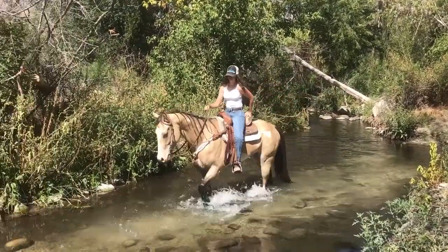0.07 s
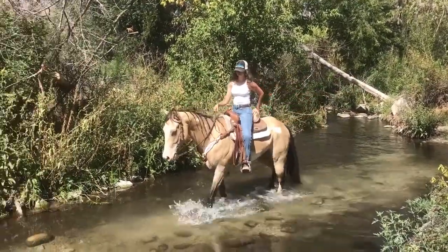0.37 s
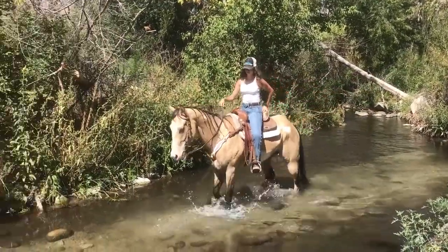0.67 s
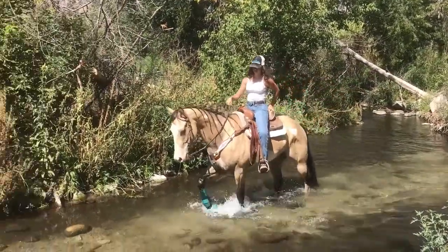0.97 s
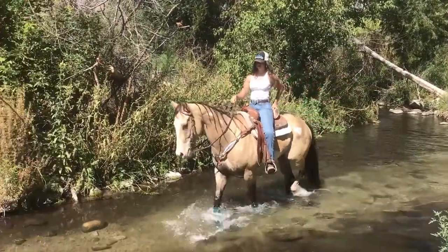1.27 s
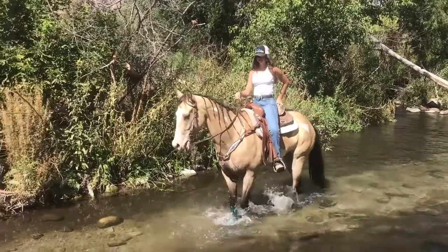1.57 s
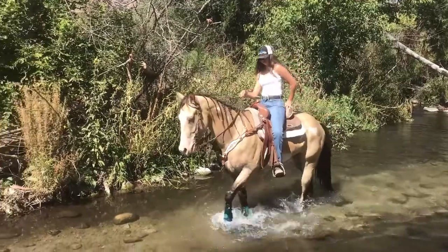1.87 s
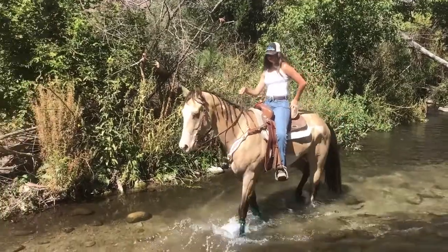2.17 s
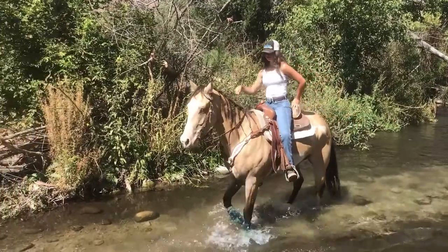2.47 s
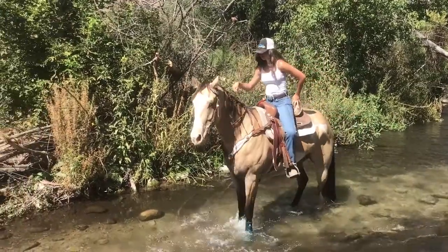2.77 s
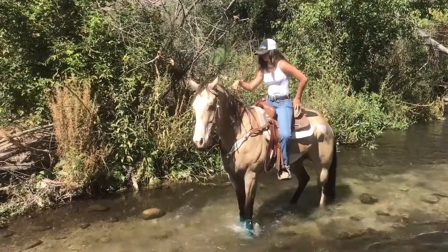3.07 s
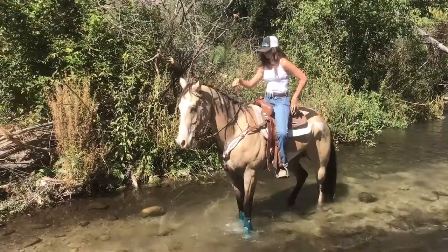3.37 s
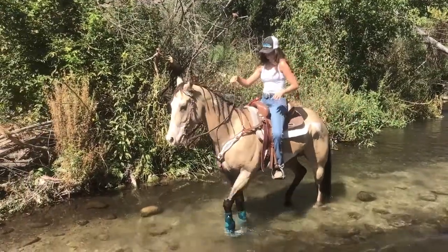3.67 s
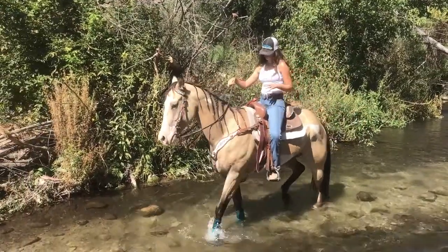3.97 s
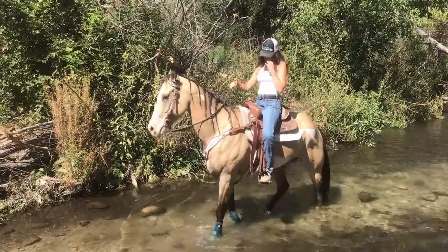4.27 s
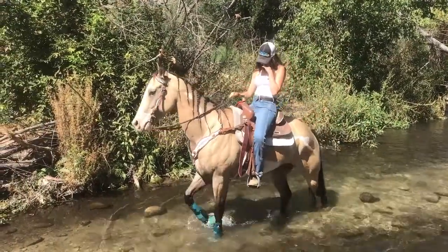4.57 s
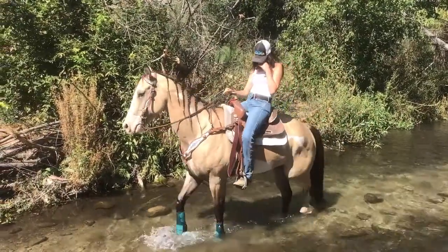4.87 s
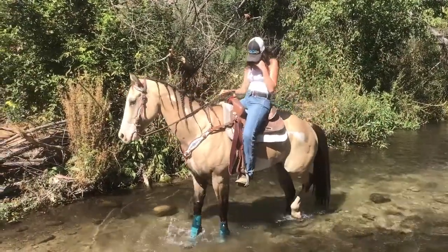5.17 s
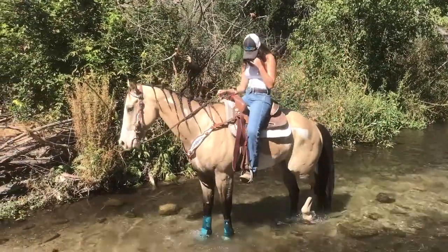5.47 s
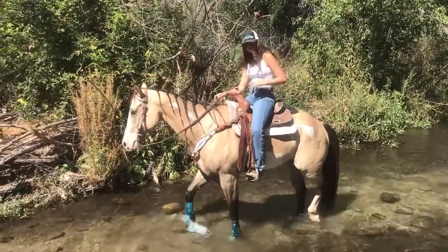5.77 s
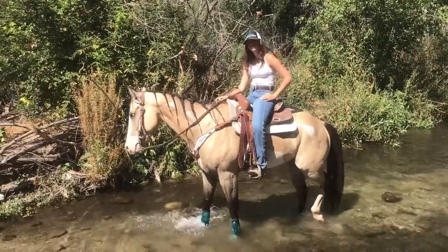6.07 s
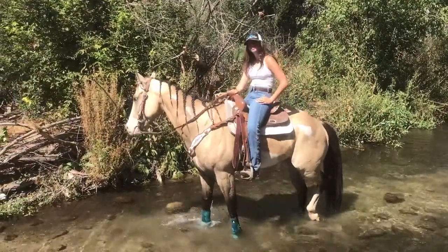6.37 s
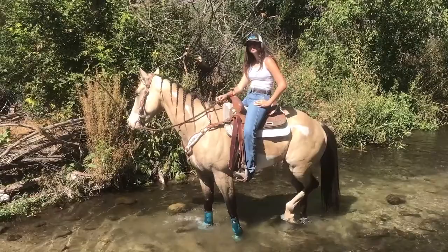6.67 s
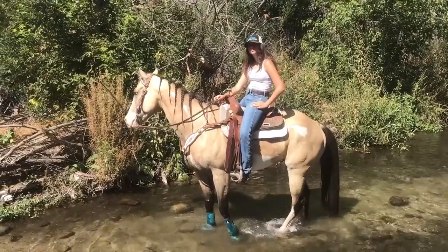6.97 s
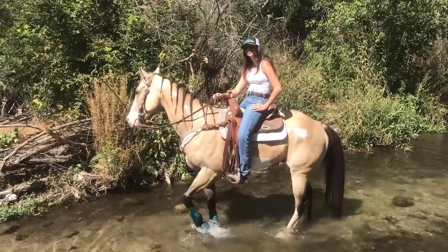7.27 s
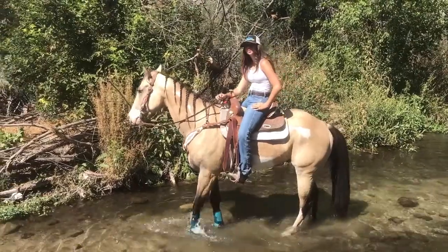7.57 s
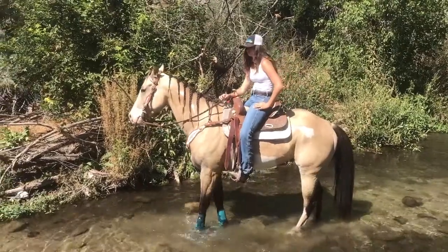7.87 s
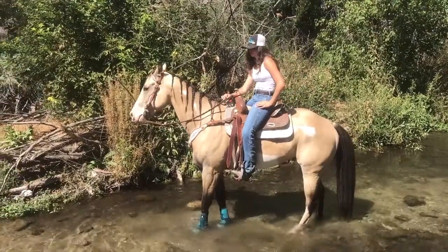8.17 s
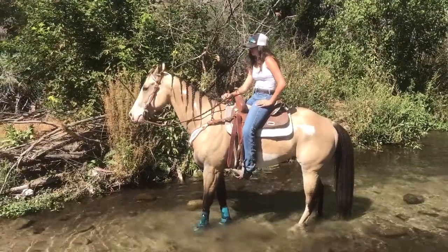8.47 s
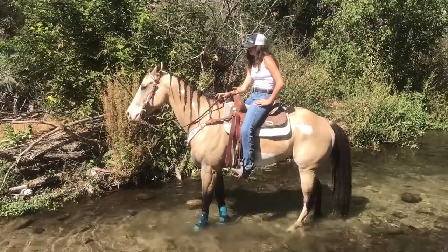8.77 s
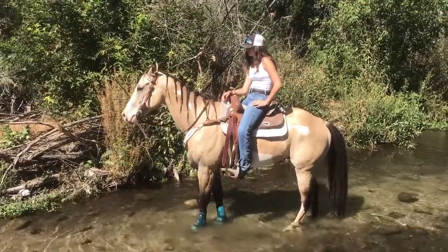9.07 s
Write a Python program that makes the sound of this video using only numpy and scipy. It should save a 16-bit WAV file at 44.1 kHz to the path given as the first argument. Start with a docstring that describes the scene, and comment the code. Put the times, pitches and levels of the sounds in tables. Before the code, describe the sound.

Steady splashing and sloshing opens the scene as a horse walks in a shallow creek. The strides then break up into occasional hoof shifts, each a gulp or smack of water followed by bubbles and dripping, until the animal stops. Beneath it all the creek trickles gently over a low rumble, with a few barely audible far bird whistles. The banks give the splashes a short, soft echo.

```python
"""Water churns and splashes as a horse wades a shallow stream, slows, shifts its hooves and stands.
Plunging hooves trap air that gulps, and water slaps the surface; what the legs throw up falls back
as bubbles and spray, and the wet legs drip. Underneath, the stream trickles on over a low outdoor
rumble. A far bird whistles faintly, and the banks give a short, soft echo."""
import sys
import numpy as np
from scipy import signal
from scipy.fft import rfft, irfft, next_fast_len
from scipy.io import wavfile
from scipy.ndimage import map_coordinates

SR = 44100
rng = np.random.default_rng(int(sys.argv[2]) if len(sys.argv) > 2 else 0)


def transcribe(signal):
    """Save signal, clipped to [-1, 1], as a 16-bit WAV file at the path in sys.argv[1]."""
    frames = np.atleast_2d(signal).T
    limited = np.clip(frames, -1, 1)
    pcm = np.round(limited * 32767).astype(np.int16)
    wavfile.write(sys.argv[1], SR, pcm)


N = 410571

# Tone colours of the noise and bubble layers. Each row: frequency in Hz, relative level in dB.
RUMBLE_EQ = [(12,-54),(24,-25),(32,-3),(45,-8),(54,8),(63,2.5),(73,-1),(85,0),(118,-8),(160,-16.5),(250,-18.5),(450,-18.5),(900,-22.5),(2000,-100)]  # outdoor low end
STREAM_EQ = [(150,-24),(400,-22),(900,5),(1600,2.5),(2400,0),(3300,-10),(5000,-30),(7000,-12),(10500,-21),(15800,-12)]  # current over stones
CHURN_EQ = [(80,-70),(180,-37),(290,-10.5),(380,-1),(520,-4.5),(720,-1.5),(1040,-1),(1400,-6.5),(1900,-9),(2600,-20),(3400,-8),(5700,-90)]  # body of the stirred water
SPRAY_EQ = [(600,-99),(1200,4.5),(2000,-3.5),(2600,-4),(3300,0.5),(4300,-5),(4900,-9.5),(5600,-7.5),(7000,-11),(8500,-14.5),(12000,-14)]  # drops pattering back
MIST_EQ = [(2000,-73),(4000,-1),(6500,-7.5),(8000,-9),(9800,-7),(10400,-13),(11300,-8.5),(13500,-8.5),(15800,-13)]  # finest fizz
SLOSH_EQ = [(50,-40),(95,12.5),(130,2.5),(180,0),(280,1),(400,-3),(600,-5),(1200,-40),(2500,-100)]  # deep water rolling
DRIP_TICK_EQ = [(200, -15), (1500, -1), (3800, 0), (7000, -9), (15000, -11)]
SPATTER_EQ = [(40, -40), (150, -6), (900, 2), (3500, 5), (6000, -4), (15000, -9.5)]

# Legs sweeping through the water. Each row: time in seconds, hold in seconds, churn level in dB,
# spray level in dB.
LEG_SWEEPS = [(0, 0.21, -47, -48), (0.318, 0.19, -49, -46), (0.748, 0.22, -50.5, -53.5),
              (1.1, 0.02, -49.5, -48), (1.264, 0.092, -44.5, -48.5), (1.543, 0.32, -45, -53.5),
              (1.89, 0.095, -65, -47.5), (2.148, 0.059, -46.5, -50.5), (2.313, 0.05, -50, -44),
              (2.466, 0.098, -41.5, -48), (2.73, .18, -50, -53), (3.758, 0.16, -59.5, -61),
              (3.966, 0.036, -49, -53.5), (4.163, 0.13, -61, -62), (4.438, 0.2, -48, -56),
              (4.692, 0.18, -53, -58.5), (4.85, 0.27, -49, -51), (5.301, 0.14, -61, -58.5),
              (5.906, 0.025, -41.5, -51.5), (6.044, 0.16, -46.5, -51), (6.964, 0.23, -52.5, -54),
              (7.25, 0.04, -50, -66), (7.388, .14, -48, -53), (7.605, 0.032, -55, -51.5),
              (7.802, 0.096, -64, -60)]
# A hoof traps air, then the hole it leaves closes with a second gulp. Each row: start in seconds,
# level in dB, pitch in Hz, ring time to -60 dB in seconds, wait until closing in seconds,
# closing level in dB, closing pitch in Hz, gurgle level in dB, slosh level in dB.
HOOF_PLUNGES = [(.3505, -23, 600, 0.0065, 0.0039, -30, 212, -48, -60),
                (.407, -32, 450, 0.019, 0.022, -26.5, 444, -34.5, -48.5),
                (.499, -37.5, 118, 0.083, 0.13, -48, 223, -53, -60),
                (.58, -44, 150, .04, .03, -50, 179, -50, -51.5),
                (.831, -30.5, 743, 0.0083, 0.042, -29.5, 873, -32, -62),
                (1.2618, -25, 364, 0.053, 0.06, -37, 580, -30, -53.5),
                (1.652, -23, 440, 0.049, 0.021, -29, 304, -44, -55),
                (1.712, -27, 470, .032, .05, -46, 400, -40, -58),
                (2.091, -27, 226, 0.059, .018, -35.5, 253, -42, -52),
                (2.32, -49, 297, 0.033, 0.052, -42, 278, -49, -57.5),
                (2.492, -31, 765, .026, 0.035, -34, 704, -35, -64),
                (2.521, -28.5, 223, 0.027, 0.051, -34, 830, -42, -49.5),
                (3.987, -26.5, 800, 0.0085, .052, -35, 710, -45, -58.5),
                (4.424, -32.5, 650, .15, .09, -35, 786, -38.5, -55),
                (4.9331, -19, 623, 0.0059, 0.025, -29, 219, -34.5, -54.5),
                (5.927, -32, 392, 0.038, 0.0098, -47, 900, -38, -70),
                (5.9503, -25, 374, 0.013, 0.017, -30.5, 376, -42, -66),
                (5.983, -33, 348, .094, .041, -33, 563, -34.5, -63),
                (6.038, -35, 368, 0.067, .02, -34, 600, -44, -62),
                (6.941, -37.5, 376, 0.019, 0.033, -59, 700, -63, -73),
                (7.121, -28.5, 837, 0.041, 0.0073, -48, 1290, -55, -74),
                (7.255, -37.5, 835, 0.033, .043, -37, 676, -64, -79),
                (7.479, -39.5, 374, 0.1, 0.055, -28.5, 820, -37.5, -64),
                (7.619, -82, 200, .04, 0.04, -55, 197, -51, -63),
                (9.183, -44.5, 200, 0.027, 0.019, -51, 500, -59, -72)]
# Big drops that ring a bubble. Each row: start in seconds, level in dB, pitch in Hz.
BIG_DRIPS = [(3.292,-39.5,2510),(3.393,-39.5,2680),(3.486,-40.5,3260),(3.756,-41,790),(3.917,-36.5,3400),(4.166,-38.5,2460),(5.133,-34,1650),(5.164,-35,1700),(5.307,-35,1380),(5.301,-35,3370),(5.394,-37,2920),(5.509,-40,2230),(5.604,-40,2230),(5.648,-38,944),(6.444,-33.5,3820),(6.522,-38,2900),(6.599,-42.5,923),(6.707,-38.5,2880),(6.838,-39,950),(7.975,-40.5,2830),(8.295,-38.5,2600),(8.703,-47,553),(8.774,-47,588),(9.049,-43.5,1420)]
# Sharp smacks on the surface. Each row: time in seconds, level in dB, pitch in Hz,
# spatter against the pop in dB.
SURFACE_SLAPS = [(.737,-35,920,-16),(1.264,-35,940,-31),(1.284,-36.5,3440,-18),(2.174,-32.5,890,-13),(2.47,-38,1310,-25),(2.913,-35,1850,-9),(3.195,-41.5,3530,-3),(3.974,-29.5,1050,-9),(4.038,-33.5,3070,0),(4.317,-40.5,4170,0),(4.404,-32,3400,18),(4.723,-33.5,1640,-10.5),(4.936,-29.5,1020,-11),(5.105,-37,3300,4),(5.466,-41.5,2900,15),(5.8697,-23,1280,-11.5),(6.07,-34,1430,-12),(6.206,-30.5,1240,-8),(6.252,-36,1324,-4),(6.941,-26.5,1097,-11),(7.091,-33,2400,-14),(7.115,-29,1270,-10),(7.184,-37,2700,-11),(7.593,-31.5,1140,-2),(7.856,-38.5,1610,-7),(8.996,-46,4820,5),(9.246,-45,2920,19)]
# A far bird's slurred notes. Each row: start in seconds, length in seconds, opening, middle and
# final pitch in Hz, level in dB.
BIRD_WHISTLES = [(3.52,0.12,5100,5100,5040,-69),(5.7,0.12,4550,4620,4600,-70),(8.488,.12,3920,4410,4250,-70),(8.72,0.16,4200,4090,4100,-69)]
# Decay of the echo off the banks. Each row: frequency in Hz, time to -60 dB in seconds.
BANK_DECAY = [(200, 0.043), (1500, 0.12), (10000, 0.058)]


def amp(db):
    """Decibels to gain."""
    return 10 ** (np.asarray(db) / 20)


def unit(x):
    """x at rms 1."""
    return x / np.sqrt(np.mean(x ** 2) + 1e-20)


def along(points, hz):
    """Read (Hz, value) points on a log frequency axis."""
    knots_hz, values = np.transpose(points)
    return np.interp(np.log(hz + 1), np.log(knots_hz + 1), values)


def wobble(rate):
    """A smooth random drift, rate knots a second."""
    return map_coordinates(rng.standard_normal(int(N * rate / SR) + 4), [np.arange(N) * rate / SR])


def filtered(x, response):
    """Filter x by a gain that depends on frequency."""
    size = next_fast_len(len(x) + 8192)
    return irfft(rfft(x, size) * response(np.fft.rfftfreq(size, 1 / SR)), size)[:len(x)]


def coloured(x, eq):
    """x through an EQ curve, at rms 1."""
    return unit(filtered(x, lambda hz: amp(along(eq, hz))))


def add(track, s, sound):
    """Mix a sound into the track at s seconds."""
    start = max(round(s * SR), 0)
    track[start:start + len(sound)] += sound[:max(N - start, 0)]


def swell(s, hold_s, rise_db_per_s, fall_db_per_s):
    """An envelope that climbs to 1 at s seconds, holds and dies away; one point per 64 samples."""
    age = np.arange(0, N, 64) / SR - s
    return amp(rise_db_per_s * np.minimum(age, 0) - fall_db_per_s * np.maximum(age - hold_s, 0))


def summed_db(swells):
    """Level per sample of swells that add in power."""
    power = sum(gain ** 2 for gain in swells)
    return np.interp(np.arange(N), np.arange(0, N, 64), 10 * np.log10(power + 1e-12))


def bubble(t, hz, t60, rise, onset_cycles):
    """A ringing air pocket, whose pitch climbs as it nears the surface."""
    age = t / t60
    phase = 2 * np.pi * hz * t * (1 + rise * np.minimum(age, 2) / 2)
    attack = 1 - np.exp(-(t * hz / onset_cycles) ** 2)
    return np.sin(phase) * attack * amp(-60 * age)


def swarm(count, low_hz, high_hz, cycles, spread_db, size):
    """A cloud of bubbles of random time, pitch, life and strength, each cut at size samples; rms 1."""
    when, pitch, life, strength, sign = rng.random((count, 5)).T[:, :, None]
    hz = low_hz * (high_hz / low_hz) ** pitch
    t60 = np.minimum(cycles * 2 ** (2 * life - 1) / hz, size / SR)
    gain = amp(-spread_db * np.log(1 - .99 * strength)) * np.sign(sign - .5)
    rings = gain * hz * bubble(np.arange(size) / SR, hz, t60, rise=.1, onset_cycles=.5)
    places = (when * N).astype(int) + np.arange(size)
    return unit(np.bincount(places.ravel(), rings.ravel(), N)[:N])


def rumble():
    """A low, steady outdoor bed."""
    return amp(-56) * coloured(rng.standard_normal(N), RUMBLE_EQ)


def stream():
    """The current trickles softly over the stones: tiny bubbles in a gently wavering hiss."""
    ripples = swarm(count=2500, low_hz=450, high_hz=6000, cycles=22, spread_db=2.2, size=1200)
    level_db = -61 + .91 * wobble(8)
    hiss = amp(6.5) * rng.standard_normal(N)
    return amp(level_db) * coloured(ripples + hiss, STREAM_EQ)


def burbles():
    """Here and there the current folds a bigger, longer-ringing bubble over a stone."""
    return amp(-67.5) * swarm(count=110, low_hz=482, high_hz=1473, cycles=48, spread_db=1, size=4000)


def stirred(sweeps, walk_db, rest_db):
    """Level in dB of water thrown up by each sweep and running off the leg, over a steady wash."""
    rise = 165  # dB a second: the water leaps up
    thrown = [amp(db) * swell(s, hold, rise, fall_db_per_s=79) for s, hold, db in sweeps]
    runoff = [amp(db - 10) * swell(s, hold, rise, fall_db_per_s=28) for s, hold, db in sweeps]
    walk_end_s = 2.65  # the wash settles as the horse slows, leaving the current around its legs
    walking = amp(walk_db) * swell(0, walk_end_s, rise, fall_db_per_s=21.5)
    return summed_db(thrown + runoff + [walking, amp(rest_db)])


def wash(churn_db, spray_db):
    """Churned water bubbles and spray patters down; harder stirring merges the drops into a rush."""
    sparse = swarm(count=1900, low_hz=450, high_hz=2200, cycles=24, spread_db=2.2, size=1600)
    dense = swarm(count=7000, low_hz=260, high_hz=2600, cycles=12, spread_db=2.5, size=700)
    drops = swarm(count=2600, low_hz=2200, high_hz=8500, cycles=32, spread_db=3.2, size=600)
    patter = swarm(count=20000, low_hz=1700, high_hz=8000, cycles=15, spread_db=2.3, size=240)
    fizz = swarm(count=14000, low_hz=6000, high_hz=15000, cycles=7, spread_db=3.2, size=90)
    ticks = swarm(count=700, low_hz=3140, high_hz=9370, cycles=93, spread_db=4, size=700)
    merged = np.clip((spray_db + 68) / 22, .3, .95)  # crossfade from single drops to a rush
    churn = np.sqrt(1 - merged) * sparse + np.sqrt(merged) * dense + 1.1 * rng.standard_normal(N)
    spray = np.sqrt(1 - merged) * drops + np.sqrt(merged) * patter + 1.1 * rng.standard_normal(N)
    mist = fizz + 1.2 * rng.standard_normal(N)
    full_spray_db = -47
    mist_db = -50 + 1.13 * (spray_db - full_spray_db)  # mist grows a little faster than spray
    flutter_db = 1.06 * wobble(40)
    return (amp(churn_db - 1.5 + 2.1 * wobble(19)) * coloured(churn, CHURN_EQ)
            + amp(spray_db + .6 + flutter_db) * coloured(spray, SPRAY_EQ)
            + amp(mist_db + flutter_db) * coloured(mist, MIST_EQ)
            + amp(spray_db - 7) * (1 - merged) * ticks)  # lone droplets landing crisply


def slosh(churn_db):
    """Big slow bubbles roll up around the legs, most of all just after a plunge."""
    heaves = [amp(db) * swell(s + .013, hold_s=.09, rise_db_per_s=200, fall_db_per_s=114)
              for s, *_, db in HOOF_PLUNGES]
    wake = amp(churn_db - 16)  # deep water moves under every sweep
    rolling = swarm(count=2000, low_hz=100, high_hz=600, cycles=6, spread_db=2, size=2400)
    return np.hypot(amp(summed_db(heaves)), wake) * coloured(rolling, SLOSH_EQ)


def air_pockets():
    """Each plunge makes a trapped pocket, a closing hole and three gurgling strays."""
    closing_cycles, stray_cycles, stray_octaves = 16, 28, .94
    fragments_db, closing_fragments_db = -10.5, -3.5  # the closing hole breaks up loudest
    pockets = []
    for s, db, hz, t60, wait, closing_db, closing_hz, gurgle_db, _ in HOOF_PLUNGES:
        pockets.append((s, db, hz, t60, fragments_db))
        closing_t60 = closing_cycles / closing_hz
        pockets.append((s + wait, closing_db, closing_hz, closing_t60, closing_fragments_db))
        for late, pitch in rng.random((3, 2)):
            stray_s = s + (wait + .02) * late
            stray_db = gurgle_db - late  # later strays are up to 1 dB softer
            stray_hz = np.sqrt(hz * closing_hz) * 2 ** (stray_octaves * (pitch - .5))
            pockets.append((stray_s, stray_db, stray_hz, stray_cycles / stray_hz, fragments_db))
    return pockets


def gulps():
    """A hoof's air pocket rings for a few cycles, shoves the water and breaks into smaller pockets."""
    out, t = np.zeros(N), np.arange(SR // 6) / SR
    for s, db, hz, t60, fragments_db in air_pockets():
        t60 = max(t60, .008)
        pocket = bubble(t, hz, t60, rise=.035, onset_cycles=.35)
        shove = bubble(t, hz * .674, t60 * .48, rise=.15, onset_cycles=.81)
        ring = pocket + amp(-10.5) * shove
        add(out, s, amp(db) * ring / np.abs(ring).max())
        for delay, pitch, softness in rng.random((7, 3)):
            fragment = bubble(t, hz * .803 * 2.6 ** pitch, t60=.025, rise=.19, onset_cycles=.64)
            gain = amp(db + fragments_db - 7 * delay - 5 * softness)
            add(out, s + .002 + .024 * delay, gain * fragment)
    return out


def small_drips(count):
    """After each sweep the wet leg sheds a few lesser drops, ever more rarely."""
    mean_wait_s, loudest_db, range_db, centre_hz, octaves = .35, -42, 15, 2740, 1.75
    return [(s + hold - mean_wait_s * np.log(1 - when),
             loudest_db - range_db * softness,
             centre_hz * 2 ** (octaves * (pitch - .5)))
            for s, hold, _, _ in LEG_SWEEPS for when, softness, pitch in rng.random((count, 3))]


def drips():
    """Drops fall from the legs and belly, each with a tick and a rising plink."""
    out, t = np.zeros(N), np.arange(SR // 12) / SR
    for s, db, hz in BIG_DRIPS + small_drips(count=4):
        plink = bubble(t, hz, t60=29 / hz, rise=.047, onset_cycles=2.2)
        tick = coloured(rng.standard_normal(len(t)), DRIP_TICK_EQ) * amp(-60 * t / .018)
        add(out, s, amp(db + 4) * (plink + amp(-16) * tick))
    return out


def slaps():
    """Water smacks on water: a quick lead-in of spray, then a hollow pop in a burst of spatter."""
    out, t = np.zeros(N), np.arange(SR // 12) / SR
    for s, db, hz, spatter_db in SURFACE_SLAPS:
        pop = bubble(t, hz, t60=.013, rise=.043, onset_cycles=.79)
        burst = amp(spatter_db) * coloured(rng.standard_normal(len(t)), SPATTER_EQ)
        lead_in = amp(spatter_db) * coloured(rng.standard_normal(len(t)), SPATTER_EQ)
        smack = pop + burst * amp(-60 * t / .03) * (1 - np.exp(-t / .0007))
        gain = amp(db + 3) / np.abs(smack).max()
        add(out, s, gain * smack)
        add(out, s - len(t) / SR, gain * lead_in * amp(-14 - 60 * t[::-1] / .04))  # swells into the hit
    return out


def bird():
    """Thin whistles from the bushes, each one smooth bend of pitch."""
    out = np.zeros(N)
    for s, length, start_hz, middle_hz, end_hz, db in BIRD_WHISTLES:
        progress = np.linspace(0, 1, round(length * SR))
        bend = np.polyfit([0, .5, 1], [start_hz, middle_hz, end_hz], 2)
        phase = 2 * np.pi * np.cumsum(np.polyval(bend, progress)) / SR
        envelope = np.sqrt(np.abs(np.sin(np.pi * progress)))
        add(out, s, amp(db) * envelope * np.sin(phase))
    return out


def bank_echo(x):
    """The overgrown banks scatter a short, soft echo that lingers longest in the mids."""
    hz, t, noise = signal.stft(rng.standard_normal(SR // 2), SR, nperseg=256)
    decay = amp(-60 * t / along(BANK_DECAY, hz)[:, None])
    _, tail = signal.istft(noise * decay, SR, nperseg=256)
    response = np.pad(unit(tail), (200, 0)) / np.sqrt(len(tail))  # 200 samples of pre-delay
    return signal.fftconvolve(x, response)[:N]


def scene():
    """A mono mix: gulps, slaps, drips and bird with their echo, over moving water and rumble."""
    churn_db = stirred([(s, hold, db) for s, hold, db, _ in LEG_SWEEPS], walk_db=-51.5, rest_db=-67)
    spray_db = stirred([(s, hold, db) for s, hold, _, db in LEG_SWEEPS], walk_db=-50.5, rest_db=-67.5)
    spots = gulps() + slaps() + drips() + bird()
    echo = amp(-9.5) * bank_echo(spots)
    wading = wash(churn_db, spray_db) + slosh(churn_db)
    bed = stream() + burbles() + rumble()
    return (spots + echo + wading + bed)[None]


def record(dry):
    """A brick-wall low-pass trims the very top of the treble."""
    return filtered(dry[0], lambda hz: hz < 15850)[None]


dry = scene()
out = record(dry)
transcribe(out)
```